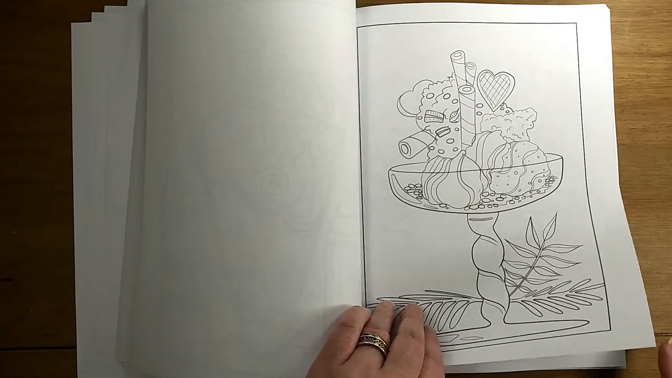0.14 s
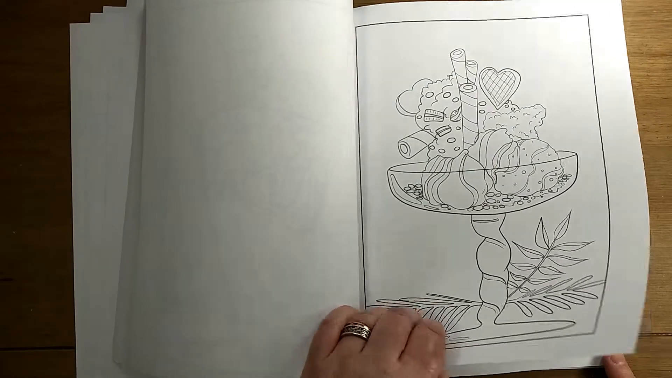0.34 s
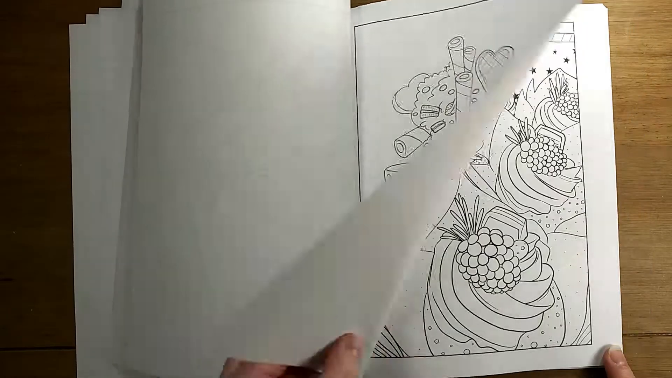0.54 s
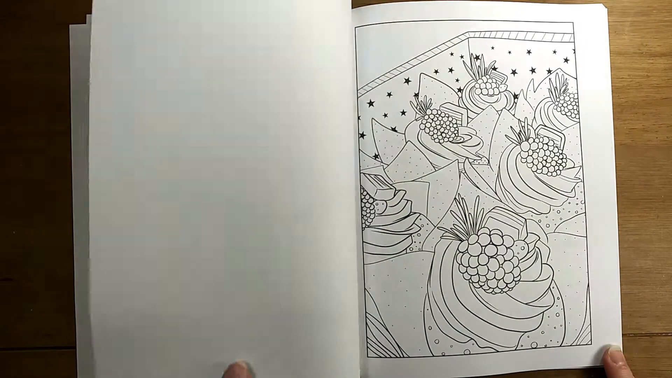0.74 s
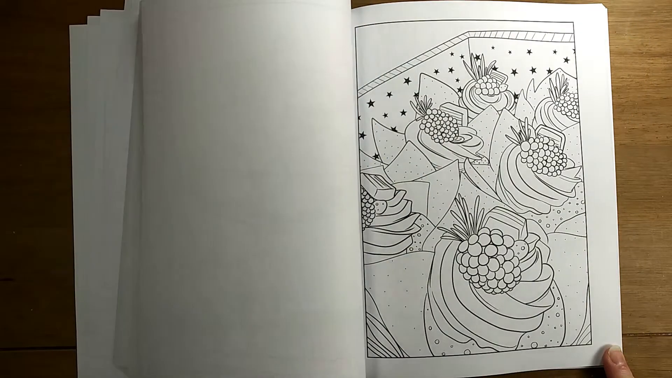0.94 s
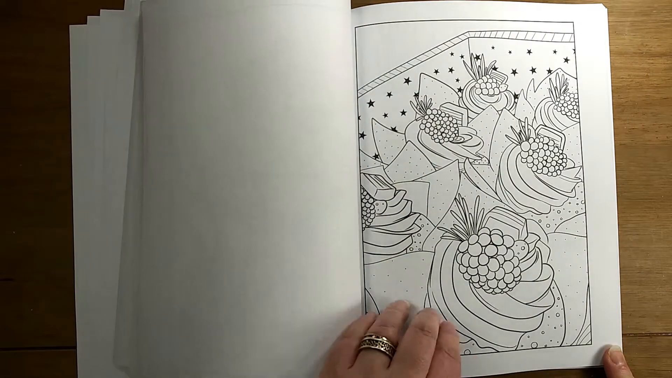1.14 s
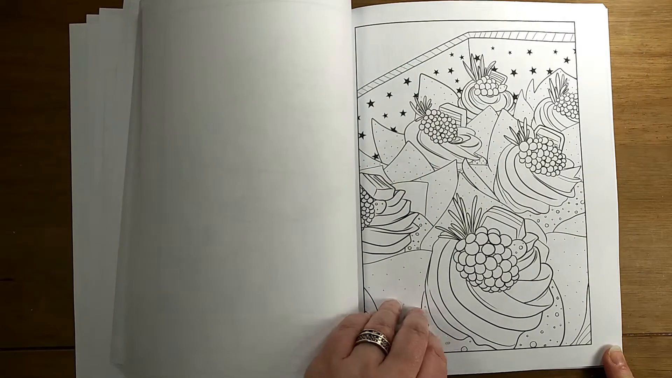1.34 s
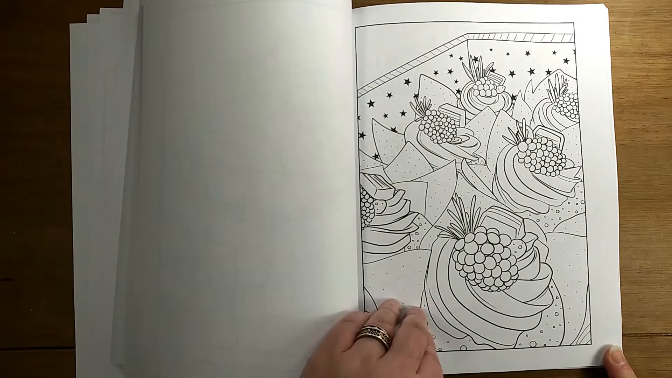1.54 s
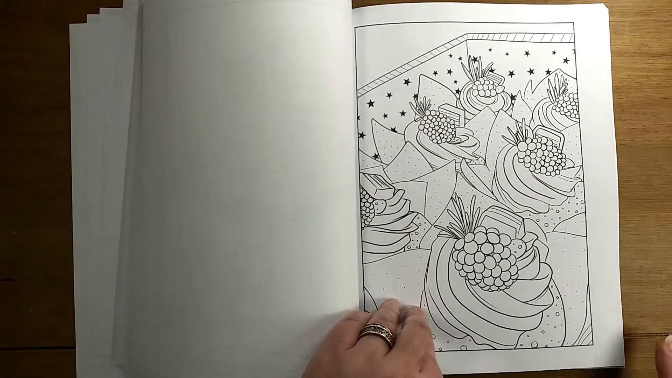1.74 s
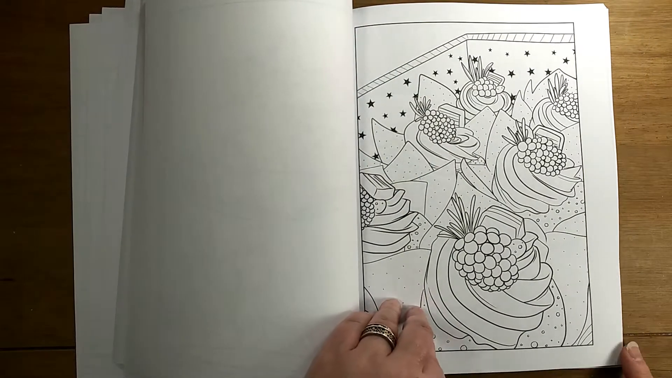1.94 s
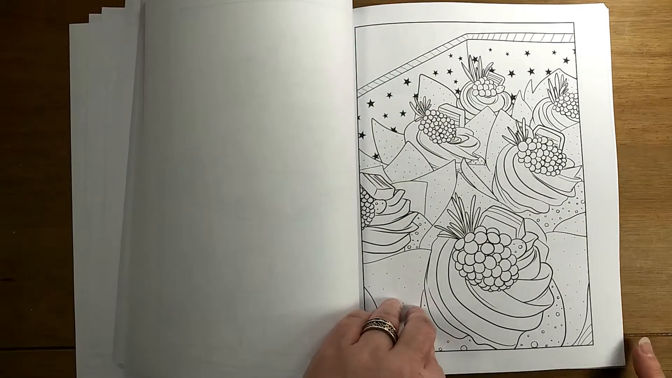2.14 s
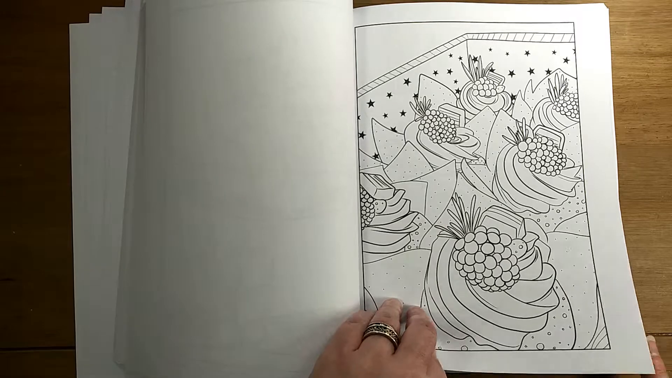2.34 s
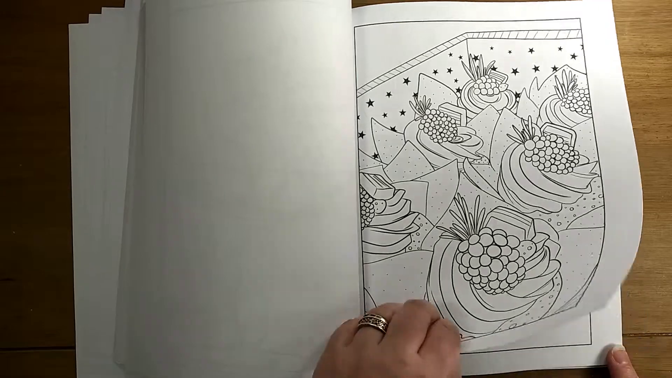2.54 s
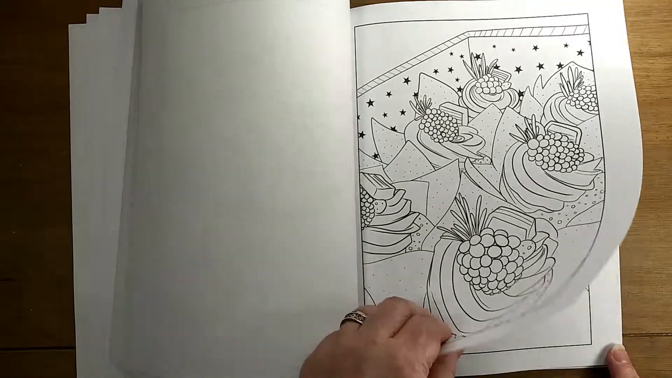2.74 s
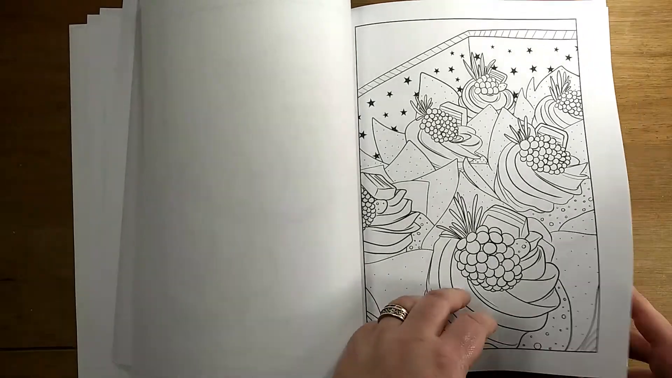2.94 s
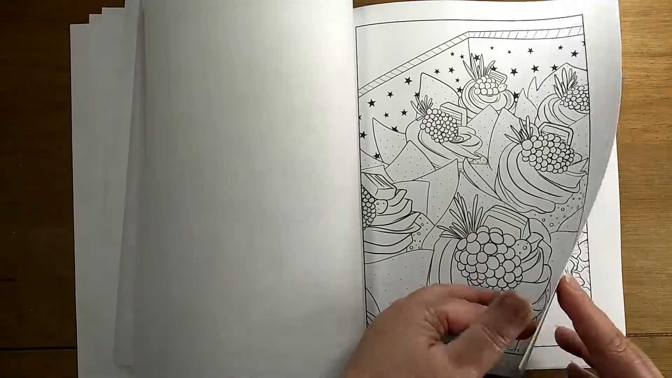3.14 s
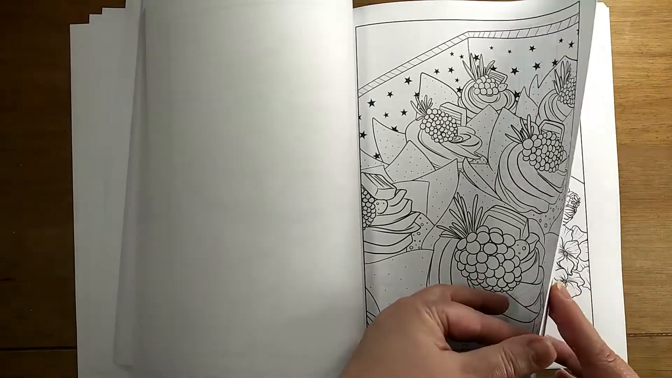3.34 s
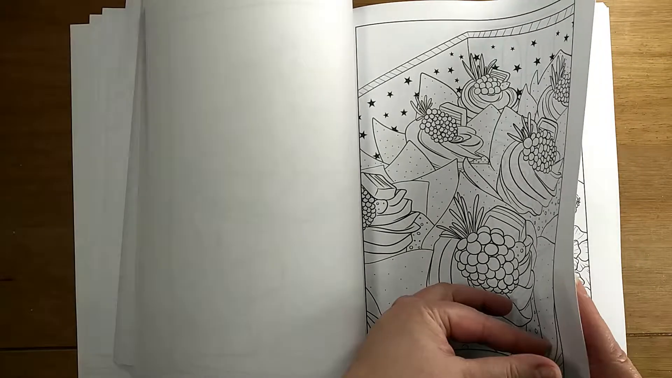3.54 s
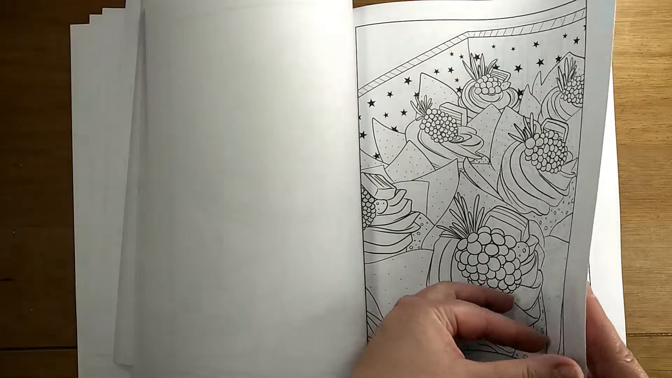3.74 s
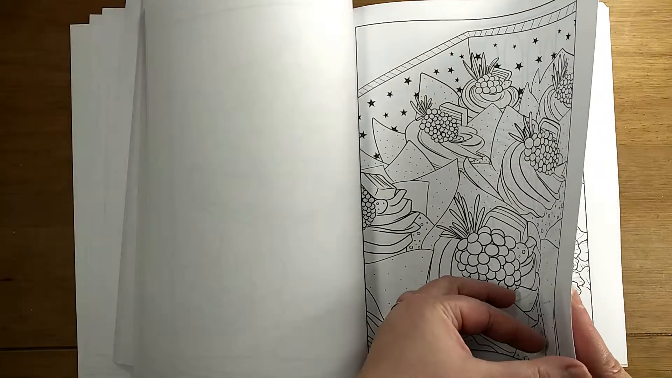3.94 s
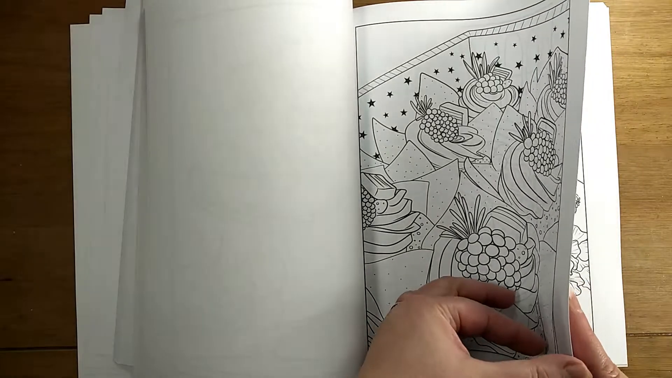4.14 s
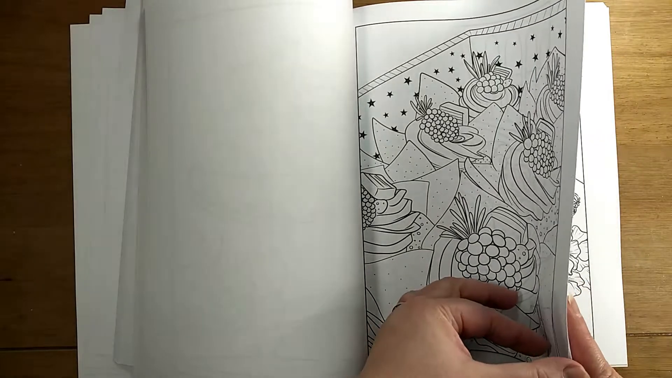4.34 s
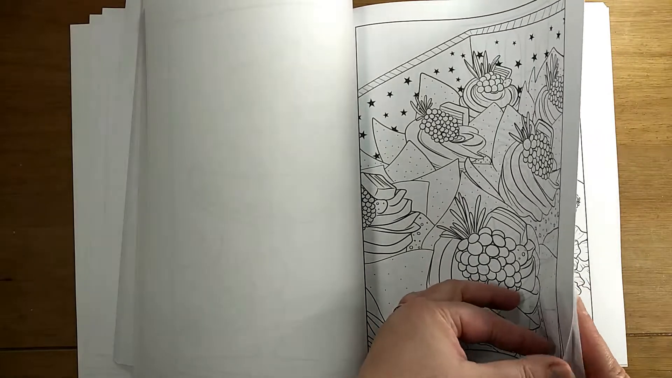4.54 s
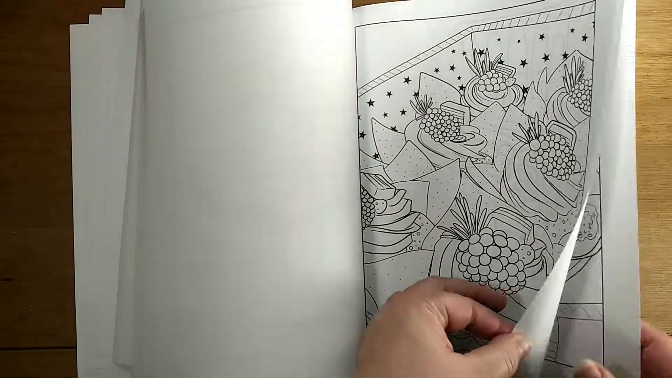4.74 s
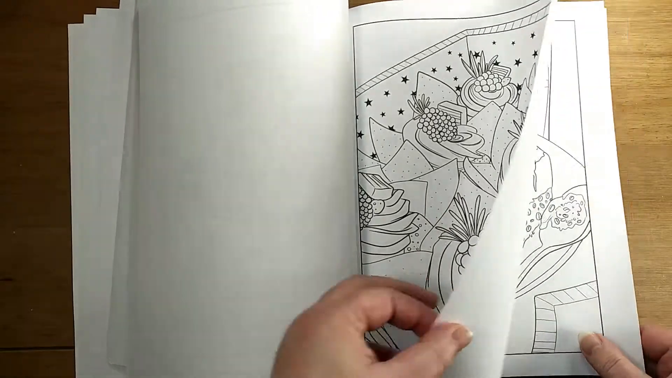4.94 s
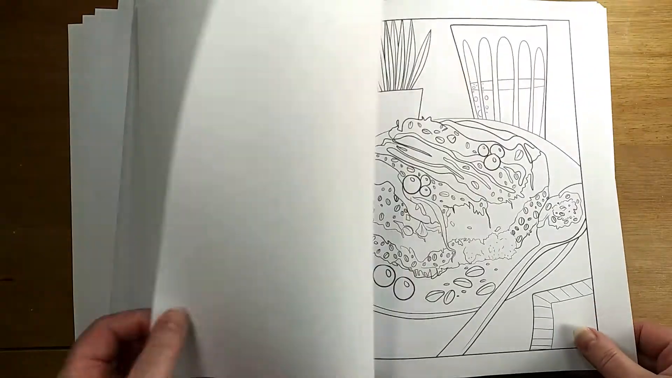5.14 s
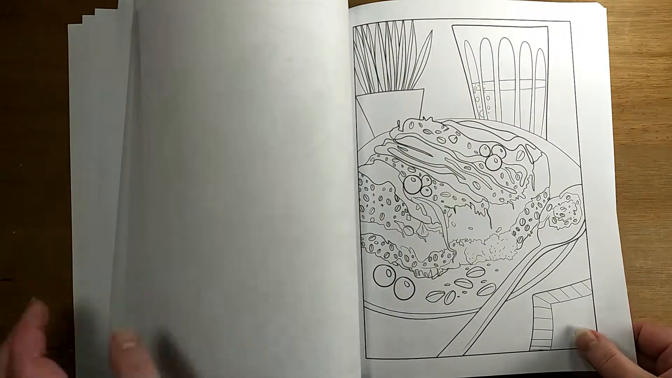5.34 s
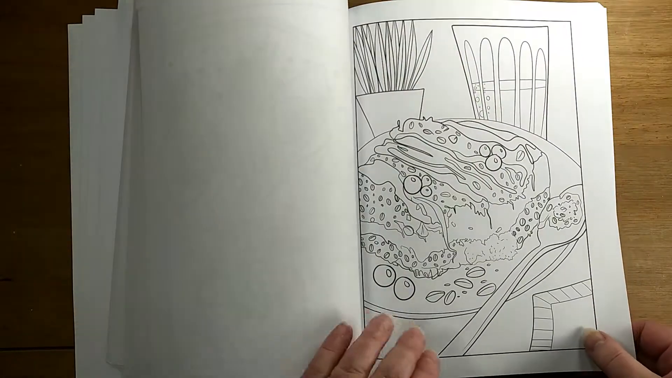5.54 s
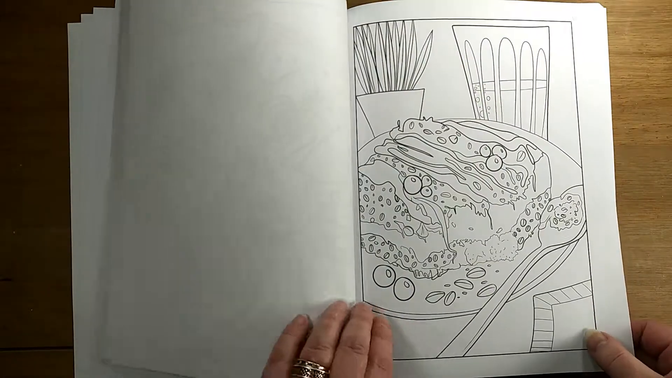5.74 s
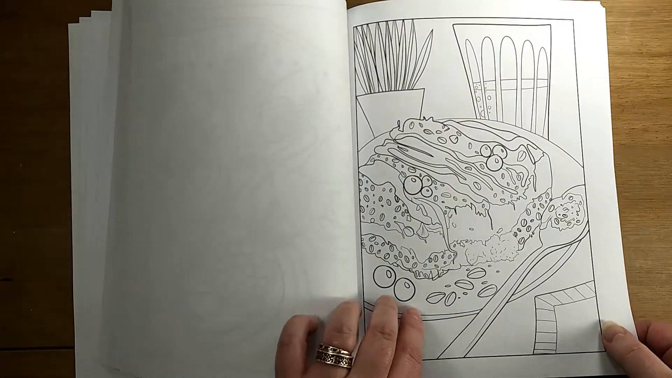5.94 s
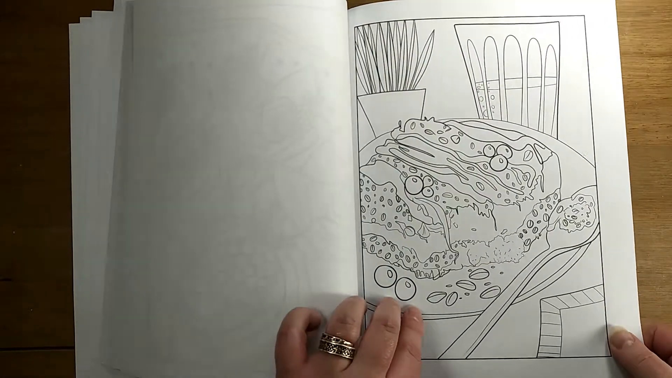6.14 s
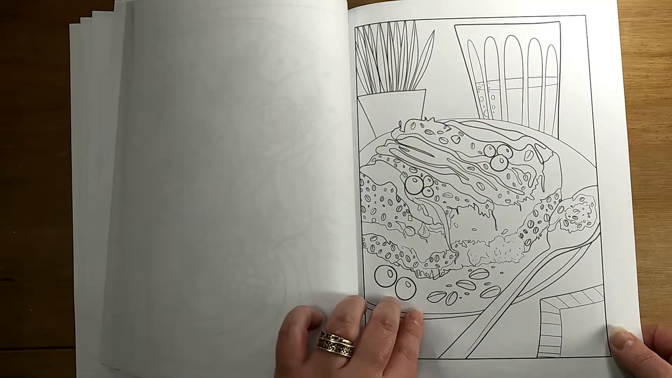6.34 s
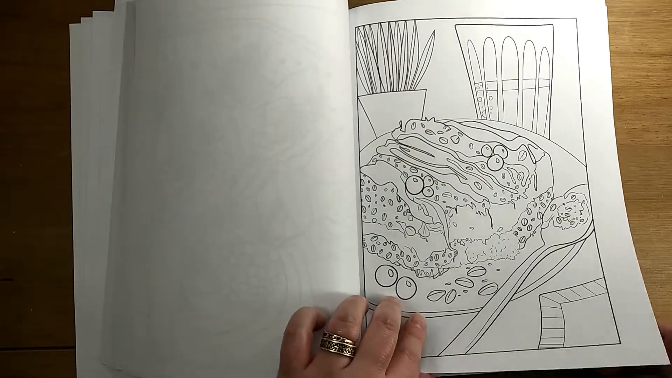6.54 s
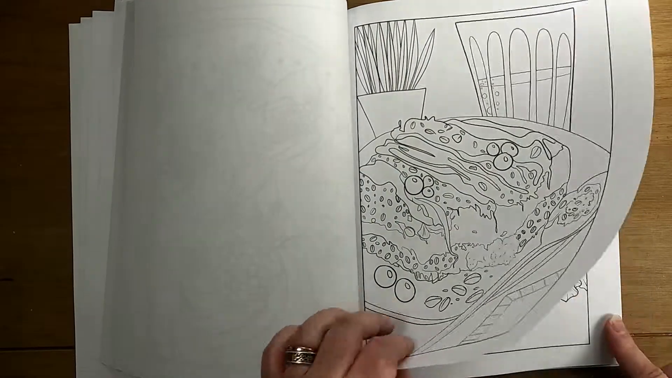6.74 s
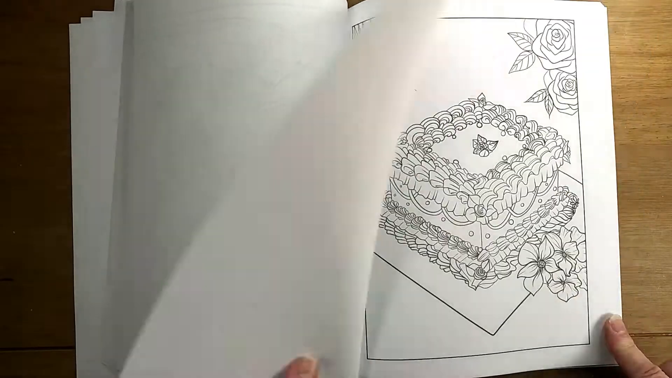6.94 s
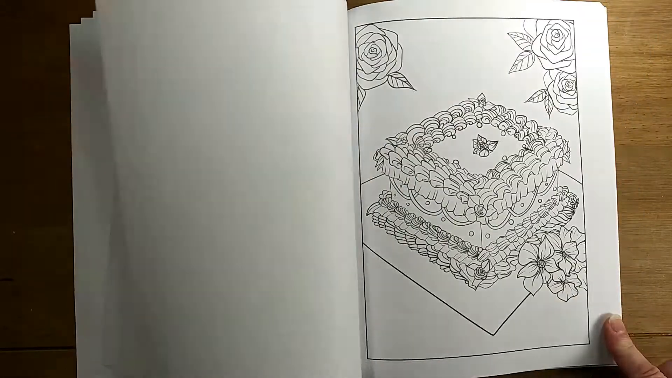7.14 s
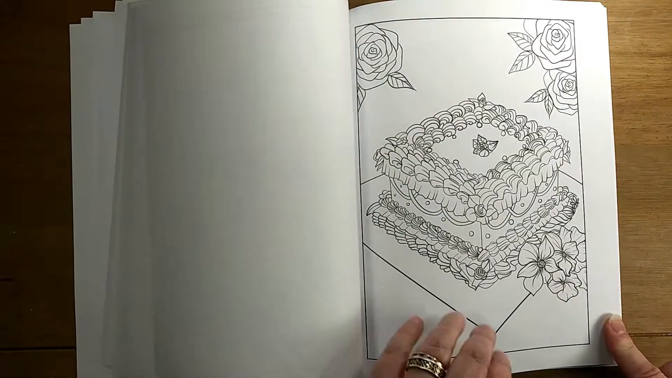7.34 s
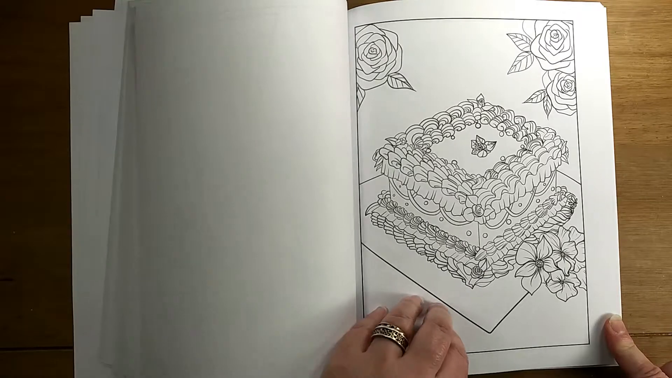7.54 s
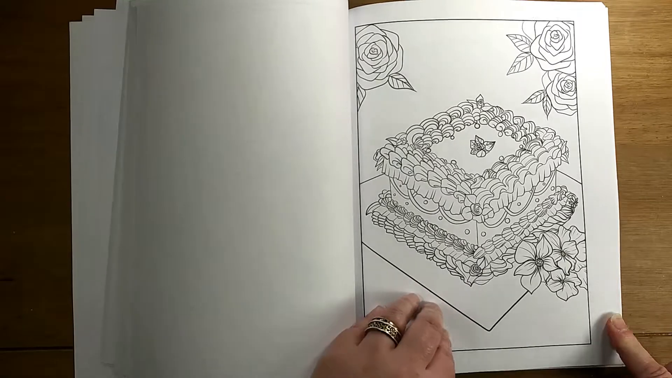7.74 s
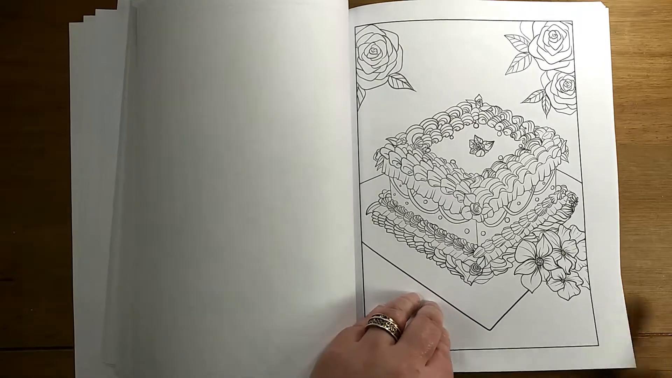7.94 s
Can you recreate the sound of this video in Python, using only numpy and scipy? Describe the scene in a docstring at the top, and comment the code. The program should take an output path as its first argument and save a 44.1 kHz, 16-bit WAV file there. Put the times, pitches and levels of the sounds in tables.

```python
"""Large pages slide, snap and flap as hands turn them in a book lying on a wooden table.
Fingers and sheets rub over paper, whose fibres catch and let go; creases flip and ring the bent sheet;
pages and fingers pat the book and squeeze out the air. A small microphone stands close above it and
drops the bass. Its hiss and the air of a quiet room lie underneath."""
import sys
import numpy as np
from scipy import signal
from scipy.fft import rfft, irfft, next_fast_len
from scipy.io import wavfile
from scipy.ndimage import uniform_filter1d

SR = 44100
rng = np.random.default_rng(int(sys.argv[2]) if len(sys.argv) > 2 else 0)


def to_wav(s):
    """Save 16-bit WAV."""
    ch = np.atleast_2d(s).T  # columns
    pcm = np.round(np.clip(ch, -1, 1) * 32767)  # PCM
    wavfile.write(sys.argv[1], SR, pcm.astype(np.int16))


N = 357210

# spectra of paper heard close: the sliding face, the fizzing edge, the belly of the page (f/Hz, level/dB)
SLIDE_SPECTRUM = [(900, -52), (1400, -4.5), (2500, 0), (3700, -2), (5000, 0), (6200, -5.5), (7500, -31)]
FIZZ_SPECTRUM = [(5500, -18.5), (6800, 1), (8000, -5), (10000, -1), (12500, -6), (15000, -11.5)]
BELLY_SPECTRUM = [(110, 4), (200, -3.5), (350, 0.5), (700, 1), (1200, 2.5), (1500, -9.5), (2100, -42)]


def gain_of(db):
    """Decibels to a factor."""
    return 10 ** (np.asarray(db) / 20)


def unit_rms(x):
    """Scales to rms 1."""
    return x / np.sqrt(np.mean(x ** 2) + 1e-20)


def value_at(points, hz):
    """Reads a table over frequency, joined on a log axis."""
    f, value = np.transpose(points)
    return np.interp(np.log(hz + 1), np.log(f + 1), value)


def coloured(x, spectrum):
    """Filters x by a spectrum table, to rms 1."""
    size = next_fast_len(len(x))
    gain = gain_of(value_at(spectrum, np.fft.rfftfreq(size, 1 / SR)))
    return unit_rms(irfft(rfft(x, size) * gain, size)[:len(x)])


def drift(samples):
    """A random curve of rms 1, smoothed twice over this many samples."""
    return unit_rms(uniform_filter1d(uniform_filter1d(rng.standard_normal(N), samples), samples))


def add(mix, start_s, sound):
    """Mixes a sound in at a time."""
    part = mix[round(start_s * SR):][:len(sound)]
    part += sound[:len(part)]


def resonate(x, hz, width_hz):
    """A resonance that can glide: shifts hz down to zero, smooths, and shifts back."""
    carrier = np.exp(2j * np.pi * np.cumsum(hz * np.ones(len(x))) / SR)
    pole = np.exp(-np.pi * width_hz / SR)
    return 2 * (carrier * signal.lfilter([1 - pole], [1, -pole], x / carrier + 1e-18)).real


def room_tone():
    """Room air and microphone hiss, swelling a little."""
    # spectrum of air and hiss together (f/Hz, level/dB)
    floor_spectrum = [(25, 3), (60, -9), (100, 0.5), (230, 2), (400, -1), (1000, -7), (1700, -9.5),
                      (3800, -13), (5300, -18), (6200, -21.5), (8000, -25), (10000, -18), (15800, -20.5)]
    level_db = -65 + 1.2 * drift(3000)
    return gain_of(level_db) * coloured(rng.standard_normal(N), floor_spectrum)


def room_reverb(x):
    """The room answers with sparse reflections of random sign, each band dying at its own speed."""
    # decay time of the room (f/Hz, t60/s)
    decay = [(300, 0.2), (2000, 0.19), (8000, 0.15)]
    taps = np.zeros(SR // 2)
    slots = np.arange(200, len(taps) - 20, 20)
    taps[slots + rng.integers(0, 20, len(slots))] = rng.choice([-1., 1.], len(slots))
    hz, t, bands = signal.stft(taps, SR, nperseg=256)
    tail = signal.istft(bands * gain_of(-60 * t / value_at(decay, hz)[:, None]), SR, nperseg=256)[1]
    return signal.fftconvolve(x, tail / np.linalg.norm(tail))[:N]


def pats():
    """Air squeezed from under the page: a few low, dull cycles."""
    # soft landings of page or finger on the book (t/s, level/dB, f/Hz, t60/s)
    landings = [(0.087, -40, 730, 0.052), (0.268, -25, 303, 0.027), (1.19, -25, 618, 0.023),
                (3.544, -23, 447, 0.029), (6.809, -30, 785, 0.044), (7.433, -22.5, 540, 0.022),
                (7.447, -39, 700, 0.049)]
    out, t = np.zeros(N), np.arange(6000) / SR
    for start, db, hz, t60 in landings:
        sag = 1.08 - 7.6 * np.minimum(t, .02)  # the pitch falls as the pocket of air empties
        wobble = 0.088 * unit_rms(uniform_filter1d(rng.standard_normal(len(t)), 120))
        envelope = (1 - np.exp(-t / 0.0042)) * gain_of(-60 * t / t60)
        add(out, start, gain_of(db) * envelope * np.sin(2 * np.pi * hz * np.cumsum(sag + wobble) / SR))
    return out


def sheet_ring(x):
    """The modes of the paper, all rung by x."""
    # modes of one sheet (f/Hz, width/Hz, level/dB)
    modes = [(470, 60, -4), (960, 44, 3), (1530, 50, -4), (1890, 55, 2), (2190, 50, -4), (2600, 120, -5),
             (3600, 60, -6), (4150, 120, -5), (4730, 90, -7), (5300, 120, -8)]
    return sum(gain_of(db) * resonate(x, hz, width) for hz, width, db in modes)


def snaps():
    """A crease flips: a click and a wide burst ring the nearest modes, with scrape, fizz and belly."""
    # snaps and scuffs (t/s, tone peak/dB, f/Hz, rise/s, t60/s, then re that peak: scrape/dB, fizz/dB,
    # belly/dB)
    flips = [(0.088, -40.5, 1070, .004, .05, -2.5, -40, -29),
             (0.316, -27, 3940, 0.0055, 0.063, -7.5, -23, -46),
             (1.238, -49, 1860, 0.003, 0.039, -16, -24, -15),
             (1.285, -54.5, 1860, .003, 0.042, -16, -19, -2),
             (1.643, -30, 4352, .004, 0.033, -17, -35, -14.5),
             (1.879, -50.5, 4490, 0.0036, .055, -16, -19, -33),
             (2.083, -56, 4350, 0.0031, 0.071, -17, -26, -20),
             (2.424, -33.5, 1900, 0.0029, 0.043, 0, -7.5, -10),
             (2.468, -51, 4800, 0.0046, .05, -10, -21, -11), (2.531, -38, 4220, .004, 0.054, -8, -21, -7),
             (2.598, -45, 1020, 0.0025, 0.044, -7, -24, 2.5),
             (2.9499, -11.5, 1920, 0.00081, 0.091, -16.5, -39, -23),
             (3.192, -48.5, 3230, 0.0042, 0.056, -6, -21, -20),
             (3.294, -45, 930, 0.0032, 0.056, 0, -30, -14), (3.454, -42.5, 960, 0.0034, 0.058, 2, -13, -22),
             (3.4853, -21, 1080, .0008, 0.052, -10, -51, -43),
             (3.525, -29.5, 5450, .006, 0.028, -1, -20, -23),
             (3.5353, -21, 2600, 0.0011, 0.061, -8, -36, -12),
             (3.694, -42, 4540, 0.0033, 0.065, 0, -35, -14),
             (3.998, -44, 4100, 0.0065, 0.047, -18, -36, -12),
             (4.095, -54.5, 3170, 0.0069, .055, -17, -8, -22),
             (4.282, -49, 1880, 0.0048, 0.06, -4, -34, -13), (4.565, -45.5, 4410, .005, .05, -5, -17, -21),
             (4.604, -42.5, 870, .004, .055, 2.5, -0.5, -11),
             (4.645, -35.5, 4150, 0.0054, .03, -31, -20, -18),
             (4.781, -32.5, 970, 0.0012, 0.11, -13, 2.5, -33),
             (4.823, -25, 1050, 0.0012, 0.044, -1, -2.5, -34), (4.928, -26, 1010, 0.0017, .04, 1, -8, -12),
             (4.957, -32.5, 860, 0.0012, .04, -1, -7, -10), (5.118, -51, 925, 0.0023, 0.048, -1, -16, -15),
             (5.224, -22.5, 3870, .002, 0.045, -12, -32, -26),
             (5.333, -40.5, 4400, .004, 0.037, -1, -27, -47),
             (5.465, -47, 2860, 0.0032, .045, -14, -15, -33),
             (5.976, -35.5, 2600, 0.0026, 0.049, -13, -25, -34),
             (5.999, -34.5, 2680, 0.0016, .045, -4, -12, -43),
             (6.026, -39.5, 2060, .002, 0.038, 5, -9, -36),
             (6.437, -30.5, 3000, 0.0023, .02, -10, -30, -28),
             (6.469, -35.5, 1850, .003, 0.071, -6.5, -20, -4),
             (6.666, -25.5, 1240, 0.00097, .06, -5, -39, -21),
             (7.432, -38.5, 1030, 0.00059, 0.028, -7, -9, -9),
             (7.474, -42, 1890, 0.0078, 0.05, -4, -14, -18),
             (7.806, -45, 1390, 0.0045, .025, 7.5, -2, -0.5)]
    hold_s, ring_db = 0.0014, -9.5
    out, t = np.zeros(N), np.arange(8000) / SR
    for start, peak_db, hz, rise, t60, *rustle_db in flips:
        noise = rng.standard_normal(len(t))
        envelope = np.minimum(t / rise, 1) ** 2 * gain_of(-60 * np.maximum(t - rise - hold_s, 0) / t60)
        click_db = 28.5 + 0.3 * peak_db  # the harder the snap, the more of it is click
        click = gain_of(click_db) * (np.arange(len(t)) == round(rise * SR))
        width = 1.1 * hz
        burst = resonate(resonate(noise * envelope + click, hz, width), hz, 2 * width)
        ring = sheet_ring(resonate(burst, hz, .3 * hz))
        tone = burst / abs(burst).max() + gain_of(ring_db) * ring / abs(ring).max()
        snap = tone / abs(tone).max()
        for db, spectrum in zip(rustle_db, (SLIDE_SPECTRUM, FIZZ_SPECTRUM, BELLY_SPECTRUM)):
            rustle = coloured(noise, spectrum) * envelope
            snap += gain_of(db) * rustle / abs(rustle).max()
        add(out, start, gain_of(peak_db) * snap)
    return out


def fibres(per_s, spread_db, clump_db):
    """Fibres catch and let go: dense clicks of uneven size that come in clumps a few ms long."""
    caught = rng.random(N) < per_s / SR
    size = np.minimum(rng.exponential(1, N), 4)
    clicks = rng.standard_normal(N) * caught
    return unit_rms(clicks * gain_of(spread_db * size + clump_db * drift(200)))


def mottled(x, depth_db):
    """Small parts of the page speak in turn: patches of about 100 Hz by 0.1 s swell and sink."""
    bands = signal.stft(x, nperseg=1024, noverlap=896)[2]
    patches = uniform_filter1d(rng.standard_normal(bands.shape), 3, axis=0)
    patches = unit_rms(uniform_filter1d(patches, 40, axis=1))
    patchy = signal.istft(bands * gain_of(depth_db * patches), nperseg=1024, noverlap=896)[1]
    return unit_rms(patchy[:len(x)])


def page_motion(t):
    """Strokes and page turns give the gains of slide, fizz and belly, and a power-weighted pitch."""
    # a finger or sheet slides over paper (t/s at full strength, rise/s, hold/s, fall/s, level/dB,
    # f/Hz of the bent sheet, then re that level: fizz/dB, belly/dB)
    strokes = [(0.17, .08, 0.022, 0.064, -43, 3300, -8.5, -16),
               (0.243, 0.015, 0.028, 0.037, -44.5, 3830, -8, -7.5),
               (0.302, 0.048, .12, 0.092, -49.5, 4600, -7.5, -8.5),
               (0.805, .02, 0.1, .2, -63.5, 3970, -9, -2.5),
               (1.139, 0.014, 0.052, 0.029, -48, 3800, -8, -14),
               (1.245, 0.033, .003, 0.015, -55, 2750, -16, 0.5),
               (1.388, 0.3, .003, 0.071, -65, 3520, -13, -2), (1.453, .05, 0.34, .05, -82, 3260, -5, -2),
               (1.894, 0.033, .003, 0.053, -63, 3310, -9, -20),
               (1.966, .03, .003, 0.022, -65.5, 3760, -3, -5),
               (2.349, 0.031, 0.043, 0.054, -57.5, 3260, -9, -5.5),
               (2.476, 0.035, .003, 0.15, -44.5, 3400, -10, -4.5),
               (2.588, 0.08, .003, 0.033, -45, 4810, -10, -17),
               (2.653, 0.047, .003, 0.038, -59, 4570, -8, -8),
               (2.731, 0.082, .003, 0.087, -45, 4050, -15, -8.5),
               (2.789, 0.031, .02, 0.063, -35.5, 3980, -11.5, -9.5),
               (2.859, .04, 0.064, 0.033, -52.5, 3000, -7.5, -5),
               (2.98, 0.066, .1, 0.068, -43, 4250, -11.5, -9.5),
               (3.2, 0.038, .003, 0.095, -62.5, 3030, -12, -4),
               (3.315, 0.084, .003, 0.085, -54, 2160, -14, -6),
               (3.392, 0.017, 0.074, .03, -61, 3700, -7.5, -9),
               (3.494, 0.022, .003, 0.054, -46, 2410, -14, -4),
               (3.555, 0.018, .003, 0.019, -56, 2630, -20, 4),
               (3.593, 0.0091, 0.0025, .01, -67, 2650, -27, -7),
               (3.715, 0.077, .003, 0.029, -51.5, 2750, -17, -2.5),
               (3.788, .03, .003, .03, -65, 3620, -14, -18), (3.874, 0.045, .003, .03, -67, 2840, -20, -6),
               (4, 0.012, .003, 0.076, -59, 3580, -19, -7.5),
               (4.101, 0.02, .003, 0.063, -61.5, 3560, -21, -8),
               (4.3, .07, .003, 0.14, -70.5, 2180, -30, 4), (4.429, .045, .003, .05, -63, 2400, -25, 0),
               (4.488, .03, .08, .03, -69, 2900, -10, -4),
               (4.611, 0.051, .003, 0.052, -49.5, 3580, -13, -10),
               (4.694, 0.016, 0.01, .025, -41.5, 3530, -12, -14),
               (4.781, 0.0044, 0.015, 0.024, -36.5, 3850, -13, -13),
               (4.843, 0.029, .003, 0.042, -46, 3600, -18, -7),
               (4.929, 0.062, .003, 0.025, -49.5, 2720, -11, -4),
               (4.97, 0.069, 0.0034, 0.1, -45.5, 2860, -13, -5.5),
               (5.047, 0.047, 0.0092, 0.053, -52, 2900, -14, -3),
               (5.152, 0.11, .003, 0.019, -52, 3650, -14, -4.5),
               (5.193, 0.0092, 0.012, 0.032, -41.5, 4260, 1, -10),
               (5.215, 0.024, .003, 0.051, -39, 3650, -8.5, -10),
               (5.339, 0.034, 0.052, 0.069, -54, 3660, -13, -19),
               (5.518, 0.073, .003, 0.095, -51, 2960, -19, -40),
               (5.584, 0.066, .003, 0.077, -45.5, 2980, -13, -10.5),
               (5.684, 0.14, .003, 0.092, -51.5, 3400, -8, -6.5),
               (5.795, 0.032, 0.0034, 0.046, -41.5, 3300, -14, -25),
               (5.846, 0.021, 0.074, 0.032, -48, 3300, -10.5, -13.5),
               (5.954, 0.054, .003, 0.03, -45.5, 3060, -13.5, -7.5),
               (5.98, 0.032, .1, 0.17, -69, 3800, -2, 2.5),
               (6.306, 0.0086, .003, 0.023, -61.5, 3560, -9, -8),
               (6.44, 0.057, 0.14, .03, -60.5, 3520, -7, 1),
               (6.547, 0.074, 0.035, .02, -43, 3860, -10.5, -11.5),
               (6.658, 0.07, .003, 0.05, -45.5, 3150, -9, -6.5),
               (7.078, 0.014, 0.032, 0.088, -67, 3400, -12, 6),
               (7.284, .06, 0.092, 0.034, -66.5, 3540, -5.5, 0),
               (7.449, 0.012, .003, .1, -54.5, 2490, -14, 3.5), (7.82, .02, .2, .05, -77.5, 3000, -15, -2),
               (7.564, 0.048, .003, 0.036, -49, 4200, -7, -9),
               (7.605, .03, 0.19, .05, -65.5, 3750, -9.5, -6.5),
               (8.092, 0.065, .03, .02, -51.5, 3300, -6.5, -18)]
    # a whole page sweeps across the book, one list a page (t/s, level/dB, f/Hz of the bent sheet)
    turns = [
        [(0.47, -64, 3400), (0.528, -48.5, 2560), (0.556, -39.5, 2200), (0.62, -38.5, 2530), (0.714, -45, 4070),
         (0.792, -51.5, 4600), (0.8, -73, 4460)],
        [(6.67, -51, 3500), (6.69, -48, 3650), (6.76, -49.5, 4830), (6.815, -43.5, 4000), (6.85, -45.5, 3600),
         (6.89, -42.5, 3120), (6.956, -36, 2300), (6.982, -37.5, 2670), (7.044, -46, 4200), (7.06, -64, 4030)],
    ]
    full_at, rise, hold, fall, db, hz, fizz_db, belly_db = np.transpose(strokes)[:, :, None]
    rising = 1 + (t - full_at) / rise
    falling = 1 + (full_at + hold - t) / fall
    ramp = np.clip(np.minimum(rising, falling), 0, 1) ** 1.54
    moves = list(zip(ramp * gain_of(db), hz, fizz_db, belly_db))
    for times, db, hz in map(np.transpose, turns):
        bend_hz = np.interp(t, times, hz)
        gain = gain_of(np.interp(t, times, db, left=-200, right=-200))
        fizz_db = -29 + 5.9 * bend_hz / 1000  # the tighter the page bends, the more its edge fizzes
        moves.append((gain, bend_hz, fizz_db, -11.5))
    slide, fizz, belly, weighted_hz = np.zeros((4, len(t)))
    for gain, hz, fizz_db, belly_db in moves:
        power = (gain + 1e-7) ** 2
        slide += power
        fizz += power * gain_of(fizz_db) ** 2
        belly += power * gain_of(belly_db) ** 2
        weighted_hz += power * hz
    return np.sqrt(slide), np.sqrt(fizz), np.sqrt(belly), weighted_hz / slide


def slides():
    """Paper rubs on paper: fibre clicks feed the bent sheet, its edge and its belly."""
    t, coarse_t = np.arange(N) / SR, np.arange(0, N + 40, 40) / SR
    slide, fizz, belly, bend_hz = (np.interp(t, coarse_t, curve) for curve in page_motion(coarse_t))
    rub = mottled(fibres(per_s=14000, spread_db=1.0, clump_db=0.46), depth_db=3.5)
    # the curve of the lifted page favours one band, which moves as it bends
    bent = gain_of(3.5) * unit_rms(resonate(rub, bend_hz, width_hz=1930))
    ring = gain_of(-9.5) * unit_rms(sheet_ring(rub))
    face = coloured(rub + bent + ring, SLIDE_SPECTRUM)
    return slide * face + fizz * coloured(rub, FIZZ_SPECTRUM) + belly * coloured(rub, BELLY_SPECTRUM)


def scene():
    """The book close under the microphone, in mono, with a little reverb over the room tone."""
    book = slides() + snaps() + pats()
    return (book + gain_of(-15) * room_reverb(book) + room_tone())[None]


def record(dry):
    """The small microphone drops the bass; a steep filter cuts the highest treble."""
    low_cut_hz, high_cut_hz = 270, 15750
    thin = signal.sosfilt(signal.butter(3, low_cut_hz, "high", fs=SR, output="sos"), dry)
    lowpass = signal.firwin(511, high_cut_hz, window=("kaiser", 9), fs=SR)
    return signal.oaconvolve(thin, lowpass[None], "same")


dry = scene()
out = record(dry)
to_wav(out)
```